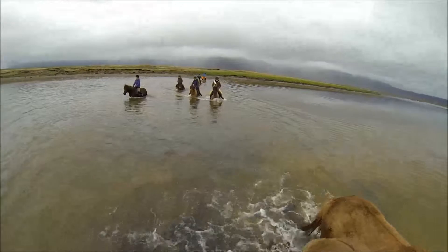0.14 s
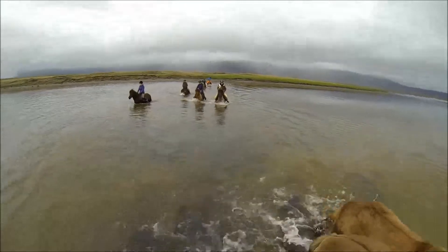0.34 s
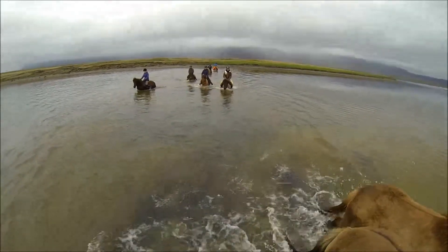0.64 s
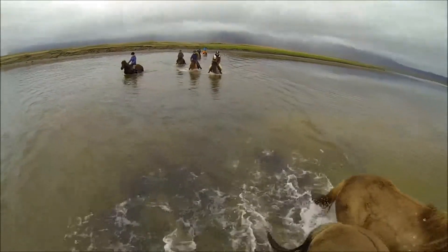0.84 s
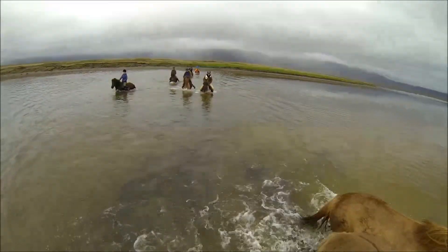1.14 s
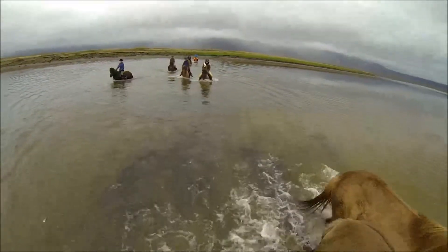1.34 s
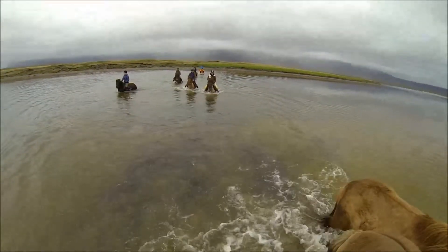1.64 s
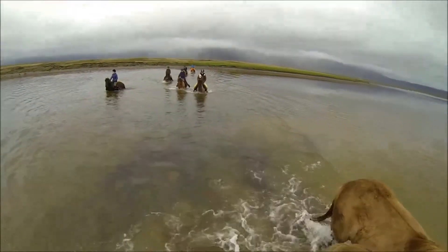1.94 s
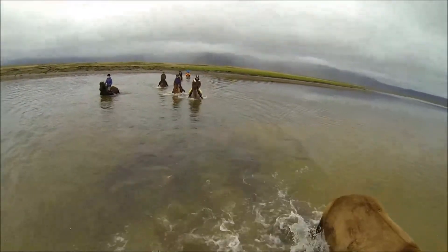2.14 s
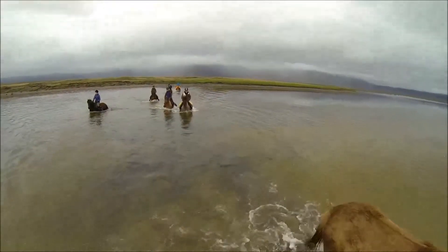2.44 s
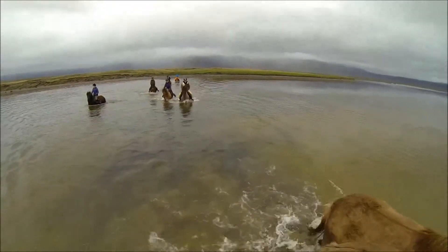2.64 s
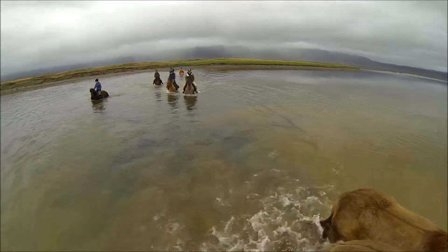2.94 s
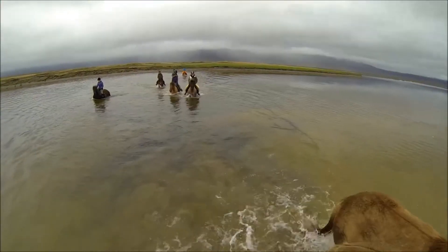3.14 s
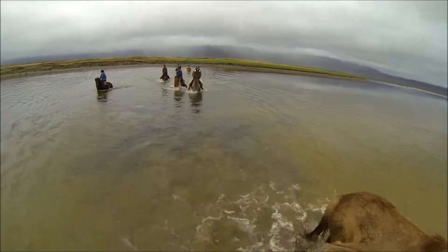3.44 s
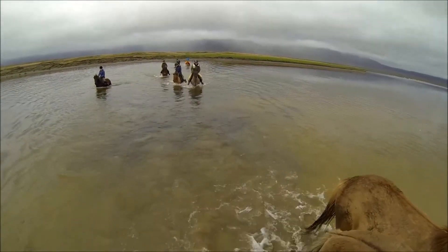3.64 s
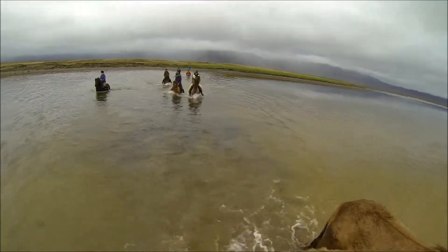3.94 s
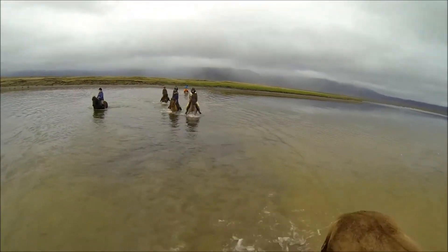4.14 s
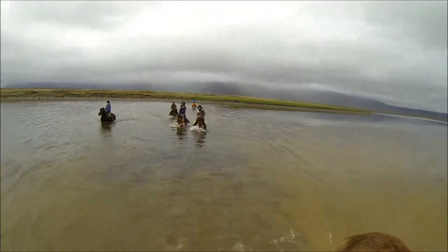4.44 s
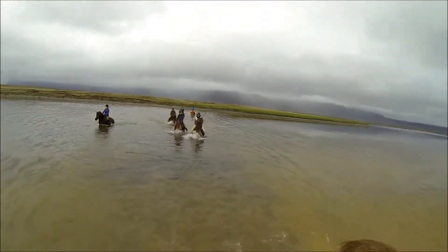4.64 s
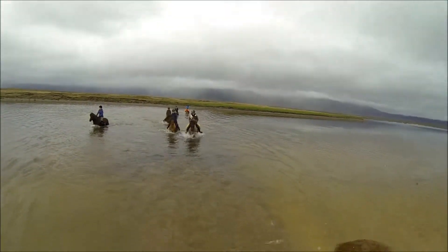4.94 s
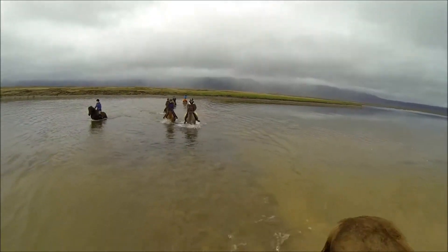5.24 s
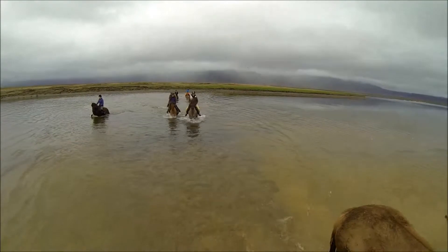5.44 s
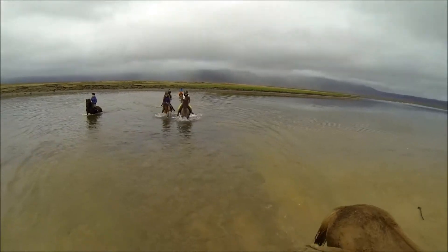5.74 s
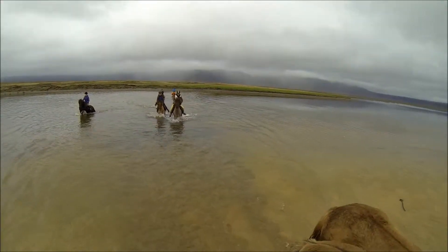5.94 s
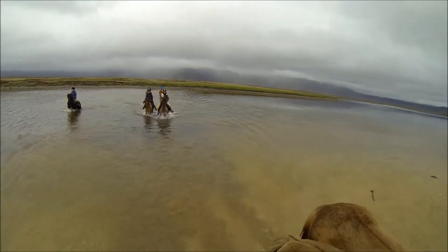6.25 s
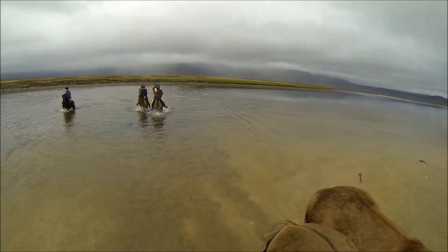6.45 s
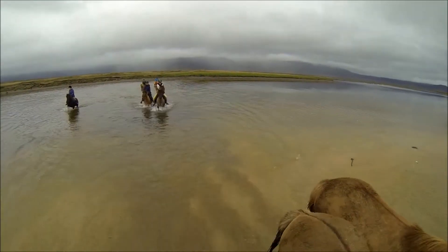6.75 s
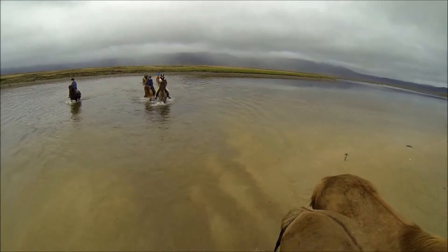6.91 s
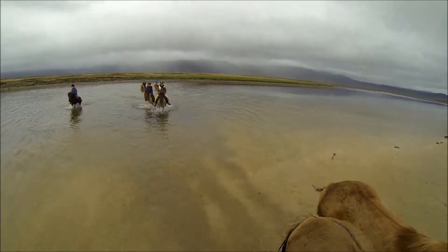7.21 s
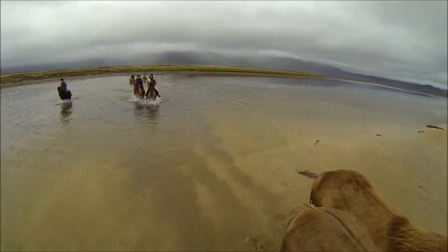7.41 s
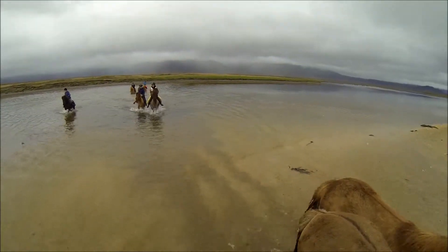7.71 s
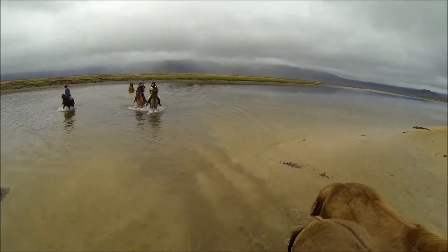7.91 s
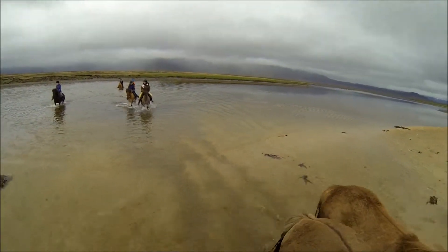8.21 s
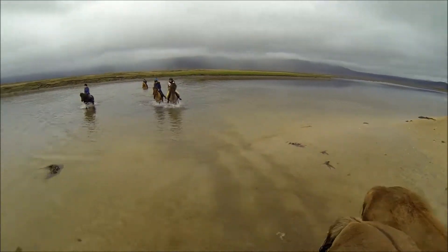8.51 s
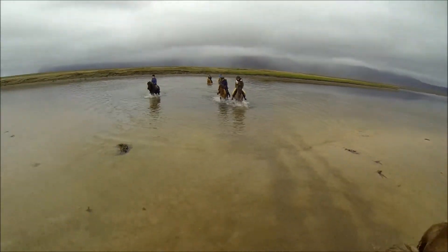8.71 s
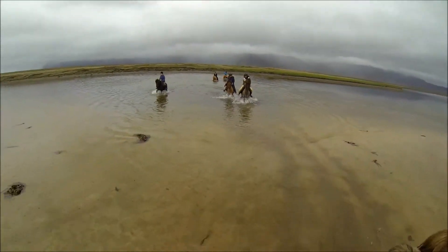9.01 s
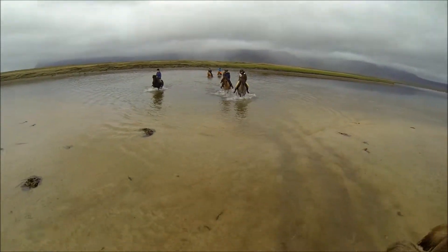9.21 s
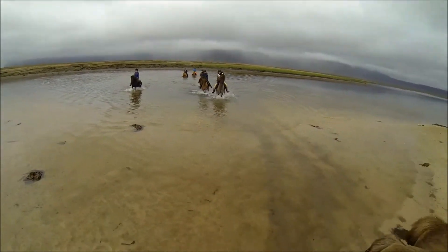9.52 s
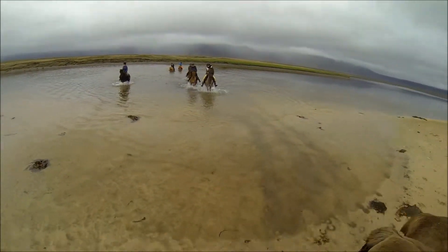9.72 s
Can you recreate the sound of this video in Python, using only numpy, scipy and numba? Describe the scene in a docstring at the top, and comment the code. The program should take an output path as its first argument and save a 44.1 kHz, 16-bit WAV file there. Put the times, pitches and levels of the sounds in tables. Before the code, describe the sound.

Continuous churned water, coloured hollow and nasal by a closed casing, surges around a horse's legs. Hoof slaps and low gulps stand out early; midway the gurgle thins, and later small crisp splashes, ticking drops and stray bubble pops patter in the shallows before nearly settling. Irregular low wind thumps and flutters press on the close, rider-worn microphone outdoors, over soft rumble and slight hiss.

```python
"""Horse wading out of a river

Churned water sloshes, sprays and gurgles: filtered noise plus swarms of ringing bubbles, calming as it gets shallow.
Slaps, plunges, drops and lone bubbles stand out as short bursts; housing resonances colour the water.
Low-frequency noise gives wind buffeting and rumble at the microphone, shut in a plastic housing on the
rider's head; jolts through the mount are single pulses, and faint hiss lies beneath."""
import sys
import numpy as np
from scipy import signal
from scipy.fft import rfft, irfft, next_fast_len
from scipy.io import wavfile
from scipy.ndimage import uniform_filter1d
from numba import njit

SR = 44100
rng = np.random.default_rng(int(sys.argv[2]) if len(sys.argv) > 2 else 0)


def bounce(signal):
    """Save signal as a 16-bit WAV file at the path given by the first command-line argument."""
    frames = np.transpose(np.atleast_2d(signal))
    limited = np.clip(frames, -1, 1)
    pcm = np.round(limited * 32767).astype(np.int16)
    wavfile.write(sys.argv[1], SR, pcm)


N = 435266


def water():
    """Slosh, spray and gurgle share one restless churn; legs swinging forward add surges."""
    # steady water: time_s, slosh_db, spray_db, gurgle_db
    wade = [(0.0, -42.5, -58, -51), (0.4, -43.5, -58.5, -56.5), (1.0, -42, -56, -51.5),
            (1.8, -42.5, -58, -54.5), (2.3, -45, -60, -58), (2.9, -45.5, -59.5, -55),
            (3.5, -47.5, -59, -61.5), (4.1, -46.5, -61.5, -58.5), (5.0, -50, -66, -60.5),
            (5.8, -50.5, -67.5, -61.5), (6.6, -53.5, -68, -61), (7.4, -51, -64.5, -61.5),
            (8.4, -53.5, -66.5, -66.5), (9.1, -51.5, -68, -61.5), (9.45, -57, -73, -65.5),
            (9.87, -54, -73, -62.5)]
    # wash in the shallows: time_s, bubbles_re_rush_db, patchiness_db
    shallows = [(0, -1, 0.23), (4, -3, 1.), (7, 0, 0.66), (9.87, -5.5, 2.3)]
    # water thrown up by a leg: crest_s, slosh_db, spray_db, length_s
    surges = [(0.022, -51.5, -57.5, 0.091), (0.48, -46, -55, .12), (0.62, -41.5, -57.5, 0.21),
              (0.938, -42, -67, .08), (1.09, -46.5, -64, .1), (1.3, -44.5, -69, 0.11),
              (1.583, -45, -55.5, 0.047), (1.737, -48, -63, 0.072), (2.53, -45, -55, 0.18),
              (2.643, -44, -53, 0.04), (2.96, -67, -64, .1), (3.135, -44, -63.5, 0.2),
              (3.667, -43, -59, 0.16), (4.057, -56.5, -73, 0.084), (4.23, -45, -68, .05),
              (4.334, -47, -69, .1), (4.48, -47.5, -73, 0.12), (4.725, -46, -63, 0.059),
              (4.85, -50.5, -66, 0.09), (4.94, -48, -68, 0.11), (5.132, -51.5, -81, 0.06),
              (5.252, -52, -73, 0.048), (5.39, -53, -78, .08), (5.554, -63, -82, 0.18),
              (5.77, -53, -69, 0.07), (6.02, -52, -69, 0.071), (6.19, -54, -70, .08),
              (6.282, -59, -72, 0.034), (6.437, -51, -67, 0.055), (6.54, -50, -73, 0.074),
              (6.67, -52, -70, 0.038), (6.747, -50, -68, 0.11), (6.97, -51.5, -62, 0.13),
              (7.028, -46.5, -73, .04), (7.158, -48, -63, 0.053), (7.264, -45.5, -65, 0.032),
              (7.417, -61, -73, 0.054), (7.49, -50, -73, .07), (7.6, -51, -70, .07),
              (7.698, -47, -58, 0.047), (7.886, -49.5, -62.5, 0.057), (7.98, -53, -73, 0.091),
              (8.116, -49, -63, 0.034), (8.213, -50, -64, 0.043), (8.313, -45.5, -69, 0.028),
              (8.394, -59, -73, 0.027), (8.47, -51, -66, 0.031), (8.525, -48, -57, 0.032),
              (8.614, -54.5, -67, 0.055), (8.683, -49, -69, 0.076), (8.853, -57, -70, 0.04),
              (9.06, -54, -74, .08), (9.164, -52.5, -73, .1), (9.36, -59, -70, 0.036),
              (9.6, -57, -75, 0.095), (9.73, -58, -76, .06)]
    slosh_db, spray_db, gurgle_db = curves(wade)
    bubbly_db, patchy_db = curves(shallows)
    crest_s, heave_db, throw_db, length_s = np.transpose(surges)
    churn = walk(14) + 0.44 * walk(40)
    noise = rng.standard_normal((3, N))

    rush = through(band(noise[0], 775, 3900))
    ringing = through(bubbles(count=4000, lo_hz=904, hi_hz=4023, cycles=9.26, rise=0.121, spread_db=1.5))
    slosh = steadied(rush + undb(bubbly_db) * ringing, window_s=0.078)
    slosh_gain = swelled(slosh_db, crest_s, heave_db, length_s, rise=1)
    slosh_gain *= undb(patchy_db * churn + 0.41 * walk(25))

    fizz = bubbles(count=7000, lo_hz=3440, hi_hz=14500, cycles=4.7, rise=0.041, spread_db=2.0)
    spray = unit(band(noise[1], 3700, 17000)) + undb(-3.5) * fizz
    spray_gain = swelled(spray_db, crest_s, throw_db, length_s, rise=1)
    spray_gain *= undb(0.42 * churn + 0.2 * walk(30))

    glugs = bubbles(count=1500, lo_hz=160.5, hi_hz=894, cycles=5.1, rise=0.186, spread_db=1.0)
    gurgle = unit(band(noise[2], 104, 794)) + undb(-4.5) * glugs
    gurgle_gain = undb(gurgle_db + 1.6 * churn + 1.2 * walk(14))
    return slosh * slosh_gain + through(spray) * spray_gain + through(gurgle) * gurgle_gain


def bubbles(count, lo_hz, hi_hz, cycles, rise, spread_db):
    """Random swarm of bubbles, some louder than the rest; rms 1."""
    when, pitch, luck = rng.random((count, 3)).T
    size = undb(spread_db * np.minimum(-np.log(1 - luck), 4.))
    start_s = when * N / SR
    pitch_hz = lo_hz * (hi_hz / lo_hz) ** pitch
    return unit(grains(start_s, pitch_hz, size, cycles, rise))


def grains(start_s, pitch_hz, size, cycles, rise):
    """Trapped air rings for some cycles and climbs in pitch as it nears the surface."""
    step = 2 * np.pi * pitch_hz / SR
    life = cycles * 2 * np.pi / step  # samples to fall to 1/e
    start = (start_s * SR).astype(np.int64)
    return ring(N, start, step, np.exp(-1 / life), (1 + rise) ** (1 / life), size)


@njit
def ring(length, start, step, decay, glide, size):
    """Each grain is a dying sine whose pitch climbs."""
    out = np.zeros(length)
    for k in range(len(start)):
        phase, w, a, i = 0., step[k], 1., start[k]
        while a > .005 and i < length and w < 2.8:  # w in rad/sample
            out[i] += size[k] * a * np.sin(phase)
            phase += w
            w *= glide[k]
            a *= decay[k]
            i += 1
    return out


def splashes():
    """Hoof slaps and leg plunges ring in froth; drops tick in the treble; lone bubbles pop."""
    # hooves on the surface, level before mix shares: start_s, level_db, centre_hz
    slap_table = [(0.16, -26, 1380), (0.4775, -26, 1450), (0.6206, -28, 1480), (0.985, -26, 1490),
                  (2.4796, -26, 1286), (2.53, -26, 1440), (2.7531, -28, 1405), (3.111, -28, 1470),
                  (3.635, -27, 1520), (4.3086, -31, 1510), (4.7247, -35, 1350), (4.9537, -29, 1425),
                  (5.239, -30, 1435), (5.3552, -31, 1360), (5.394, -29, 1346), (6.043, -31, 1300),
                  (6.2811, -35, 1470), (6.6555, -35, 1320), (6.769, -30.5, 1427), (7.019, -32, 1450),
                  (7.1242, -35, 1420), (7.246, -32.5, 1630), (7.4026, -36, 1410), (7.5, -33, 1375),
                  (7.673, -27.5, 1470), (7.7087, -30, 1440), (7.74, -29.5, 1380), (7.8511, -33.5, 1380),
                  (8.094, -32, 1595), (8.2, -31.5, 2200), (8.2194, -37, 1400), (8.2946, -38, 1450),
                  (8.3187, -33, 1670), (8.3833, -34, 1360), (8.455, -36, 1400), (8.524, -36, 1460),
                  (8.603, -31, 1414), (8.6757, -38, 1360), (8.8443, -33, 1490), (9.348, -38, 1510)]
    # legs plunging under, level before mix shares: start_s, level_db, centre_hz
    gulp_table = [(0.046, -33.5, 273), (0.13, -41, 278), (0.198, -35, 206), (0.36, -43, 221),
                  (0.578, -34, 502), (0.64, -30.5, 177), (0.857, -32.5, 215), (1.179, -35, 358),
                  (1.491, -35.5, 212), (1.559, -37, 245), (1.701, -37.5, 237), (2.109, -42, 380),
                  (2.482, -43, 197), (2.785, -34, 303), (3.064, -43, 315), (3.929, -40, 590),
                  (4.503, -40, 304), (5.26, -45, 388), (5.39, -46, 558), (6.045, -44, 550),
                  (6.758, -42.5, 543), (6.867, -40, 202), (9.16, -42.5, 330)]
    # drops close by, level before mix gain: start_s, level_db
    drop_table = [(4.2004, -45), (4.5266, -49), (4.9961, -50), (5.2585, -51), (6.1245, -53),
                  (6.3859, -44.5), (6.871, -37), (6.9626, -42), (7.2564, -43), (7.688, -37), (7.7777, -46),
                  (7.8221, -45), (8.2043, -52), (8.2936, -50), (8.3839, -49), (8.507, -41), (8.6712, -46),
                  (8.8418, -48), (9.0344, -48)]
    # single bubbles: start_s, peak_db, pitch_hz
    plop_table = [(5.09, -38.5, 3250), (5.258, -39, 3700), (5.419, -33, 1690), (8.2, -45, 4860),
                  (8.4, -48, 844), (8.57, -48, 3000), (8.575, -48, 4500), (9.03, -53, 5800),
                  (9.163, -46, 567)]
    slap_froth = through(band(rng.standard_normal(N), 600, 8000))
    gulp_froth = through(band(rng.standard_normal(N), 134, 820))
    slaps = plunge(slap_froth, slap_table, t60_s=0.069, ring_share=0.39, froth_share=0.19, reach=2.2)
    gulps = plunge(gulp_froth, gulp_table, t60_s=0.12, ring_share=0.42, froth_share=0.37, reach=3.0)
    gate = np.zeros(N)
    for start_s, level_db in drop_table:
        add(gate, start_s, burst(level_db, t60_s=0.027, attack_s=0.0011))
    ticks = 0.74 * gate * through(band(rng.standard_normal(N), 2600, 18000))
    start_s, peak_db, pitch_hz = np.transpose(plop_table)
    plops = grains(start_s, pitch_hz, undb(peak_db), cycles=4.0, rise=0.038)
    return slaps + gulps + ticks + plops


def plunge(froth, table, t60_s, ring_share, froth_share, reach):
    """Air pockets, ringing with rising pitch, each inside a rush of froth that reaches above it."""
    out = np.zeros(N)
    for start_s, level_db, centre_hz in table:
        rush = froth[int(start_s * SR):][:SR // 5]
        t = np.arange(len(rush)) / SR
        pocket = np.sin(2 * np.pi * centre_hz * t * (1 + 1.3 * t))
        rush = unit(band(rush, centre_hz / 1.8, centre_hz * reach))
        sound = ring_share * pocket + froth_share * rush
        add(out, start_s, sound * burst(level_db, t60_s, attack_s=1.07 / centre_hz))
    return out


def burst(level_db, t60_s, attack_s):
    """Envelope of a sudden rise that dies away, 0.2 s long."""
    t = np.arange(SR // 5) / SR
    return undb(level_db) * (1 - np.exp(-t / attack_s)) * 1000. ** (-t / t60_s)


def housing(x):
    """Housing resonances and dull wall as a minimum-phase response, from the cepstrum of the log gain."""
    # lifts and dips: centre_hz, width_hz, gain_db
    resonances = [(543, 200, 3.5), (775, 150, -0.5), (1278, 133, 11), (1450, 156, 13.5), (1668, 173, 11),
                  (2146, 136, 9), (2390, 94, 2), (2657, 140, -8), (3300, 570, 1), (3426, 900, 2.5),
                  (4155, 110, -8.5), (4820, 300, 6), (6110, 1220, 6), (7680, 230, -2.5), (8200, 770, 9),
                  (9360, 490, -4.5), (10980, 950, 5), (13300, 1000, 0)]
    # treble loss through the wall: freq_hz, gain_db
    wall = [(100, -9.5), (300, 0.5), (1000, -5.5), (2500, -4.5), (5000, -14.5), (9000, -18), (13500, -21.5),
            (14300, -23), (15100, -47)]
    size = 4096
    hz = np.fft.rfftfreq(size, 1 / SR)
    gain_db = shape_db(wall, hz)
    for centre_hz, width_hz, lift_db in resonances:
        gain_db += lift_db * np.exp(-.5 * (2 * (hz - centre_hz) / width_hz) ** 2)
    cepstrum = irfft(gain_db * np.log(10) / 20)
    cepstrum[1:size // 2] *= 2  # fold to the causal side
    cepstrum[size // 2 + 1:] = 0
    return signal.fftconvolve(x, irfft(np.exp(rfft(cepstrum))))[:N]


def through(source):
    """A source as heard inside the housing, rms 1."""
    return unit(housing(source))


def jolts():
    """A stride shakes the mount: one short inward push."""
    # bell-shaped pulses: centre_s, peak_db, length_s
    jolt_table = [(1.1, -11.5, 0.021), (3.86, -16, 0.026), (4.795, -18, 0.0068)]
    t = np.arange(N) / SR
    out = np.zeros(N)
    for centre_s, peak_db, length_s in jolt_table:
        out -= undb(peak_db) * np.exp(-(2 * (t - centre_s) / length_s) ** 2)
    return out


def wind():
    """Eddies press slowly on the membrane and flutter at the housing's edges; steadier rumble lies higher."""
    # steady wind: time_s, swing_db, flutter_db, rumble_db
    breeze = [(0.0, -37.5, -43, -52), (0.7, -34.5, -42.5, -51), (1.4, -37, -45, -56.5),
              (2.1, -35.5, -45, -55.5), (3.0, -39.5, -48, -55), (3.8, -32, -40, -58),
              (4.5, -37.5, -43, -56), (5.2, -37.5, -44, -57), (6.3, -42, -45, -56.5),
              (7.2, -34, -45, -57.5), (8.2, -36, -41.5, -57), (8.8, -31.5, -41, -53),
              (9.87, -32, -45.5, -52.5)]
    # eddies: crest_s, swing_db, flutter_db
    buffets = [(0.52, -36, -39), (0.66, -29, -47), (0.87, -32, -33), (1.01, -26, -28), (1.13, -26, -32),
               (1.29, -40, -36.5), (1.56, -34, -34.5), (1.67, -22.5, -48), (2.06, -38.5, -38),
               (2.44, -24.5, -43), (2.66, -32, -34.5), (2.94, -32.5, -33), (3.27, -32, -37),
               (3.46, -35, -39), (3.63, -27, -45), (3.869, -29.5, -25.5), (4.17, -22.5, -31),
               (4.43, -33, -40), (4.64, -23, -40), (4.8, -21, -46), (5.03, -27.5, -53), (5.5, -33, -51),
               (5.73, -35.5, -39.5), (5.93, -29, -38), (6.1, -29, -57), (6.4, -32, -40), (6.9, -36, -36.5),
               (7.37, -37, -34.5), (8.2, -49, -36.5), (8.45, -27, -41), (9.03, -41, -32.5),
               (9.36, -26, -33.5), (9.57, -37, -38), (9.73, -41, -45)]
    # relative spectra of the three layers: freq_hz, level_db
    swing_shape = [(1, -13.5), (3, 5.5), (8, 7.5), (16, 6.5), (25, -3.5), (34, -16.5), (60, -74),
                   (300, -120)]
    flutter_shape = [(8, -68), (18, -17.5), (30, 3), (45, 4.5), (60, -12.5), (85, -20.5), (130, -51),
                     (3000, -120)]
    rumble_shape = [(40, -33), (65, -0.5), (100, -7), (150, -13.5), (250, -23.5), (600, -32), (3000, -84)]
    swing_db, flutter_db, rumble_db = curves(breeze)
    crest_s, push_db, flap_db = np.transpose(buffets)
    swings = steadied(coloured(swing_shape), window_s=0.22)
    flutter = steadied(coloured(flutter_shape), window_s=0.103)
    push = swelled(swing_db, crest_s, push_db, length_s=0.094, rise=0.97)
    flap = swelled(flutter_db, crest_s, flap_db, length_s=0.092, rise=0.97)
    # rumble follows the flutter gain weakly
    rumble = coloured(rumble_shape) * unit(flap ** 0.26) * undb(rumble_db + 2.14 * walk(10))
    swings *= push * undb(2.8 * walk(8.7))
    flutter *= flap * undb(1.1 * walk(14))
    return swings + flutter + rumble


def swelled(steady_db, crest_s, crest_db, length_s, rise):
    """Gain of a steady level plus smooth swells, added in power; rise is a share of the fall time."""
    t, power = np.arange(N) / SR, undb(steady_db) ** 2
    for crest, top, length in np.broadcast(crest_s, undb(crest_db), length_s):
        near = slice(max(int((crest - 2 * length) * SR), 0), int((crest + 2 * length) * SR))
        since = t[near] - crest
        stretch = np.where(since < 0, rise, 1)
        power[near] += top ** 2 * np.exp(-(2 * since / length / stretch) ** 2)
    return np.sqrt(power)


def steadied(x, window_s):
    """Noise evened in loudness over the window, so its gain curve sets the swells; rms 1."""
    power = uniform_filter1d(x ** 2, int(window_s * SR))
    return unit(x / np.sqrt(power + 0.092))


def walk(rate_hz):
    """Random levels held 1 / rate_hz and smoothed twice; spread 1."""
    k = int(SR / rate_hz)
    steps = np.repeat(rng.standard_normal(N // k + 1), k)
    steps = uniform_filter1d(uniform_filter1d(steps, k), k)[:N]
    return steps / steps.std()


def coloured(points):
    """Noise of rms 1 with the given spectrum."""
    size = next_fast_len(N)
    hz = np.fft.rfftfreq(size, 1 / SR)
    spectrum = rfft(rng.standard_normal(size)) * undb(shape_db(points, hz))
    return unit(irfft(spectrum, size)[:N])


def shape_db(points, hz):
    """A spectrum read on a log-frequency axis."""
    point_hz, point_db = np.transpose(points)
    return np.interp(np.log(hz + 1e-3), np.log(point_hz), point_db)


def band(x, lo_hz, hi_hz):
    """Gentle band-pass."""
    return signal.sosfilt(signal.butter(2, [lo_hz, hi_hz], "band", fs=SR, output="sos"), x)


def curves(table):
    """Columns of a table after the time, one value per sample."""
    time_s, *columns = np.transpose(table)
    return [np.interp(np.arange(N) / SR, time_s, c) for c in columns]


def undb(db):
    """Gain of a level in dB."""
    return 10 ** (np.asarray(db) / 20)


def unit(x):
    """Scaled to rms 1."""
    return x / np.sqrt(np.mean(x ** 2))


def add(out, start_s, sound):
    """Mix a sound in at its start time."""
    i = int(start_s * SR)
    out[i:i + len(sound)] += sound[:N - i]


def scene():
    """Everything at the one microphone."""
    return (water() + splashes() + wind() + jolts())[None]


def record(dry):
    """The microphone adds its own faint hiss; a steep low-pass cuts the top."""
    hiss_db, top_hz = -67.5, 15190  # hiss level before its band-pass
    hiss = undb(hiss_db) * band(rng.standard_normal(N), 300, 8900)
    low_pass = signal.ellip(10, .2, 80, top_hz, fs=SR, output="sos")
    return signal.sosfilt(low_pass, dry + hiss)


dry = scene()
out = record(dry)
bounce(out)
```